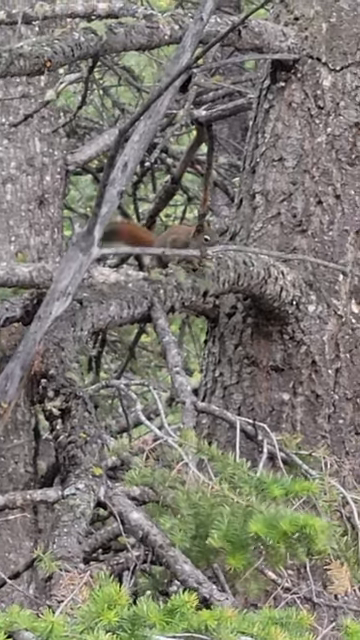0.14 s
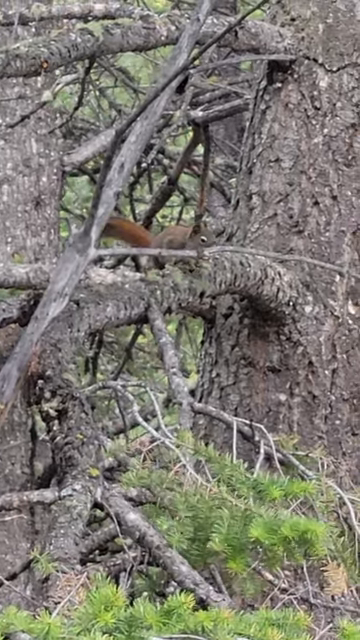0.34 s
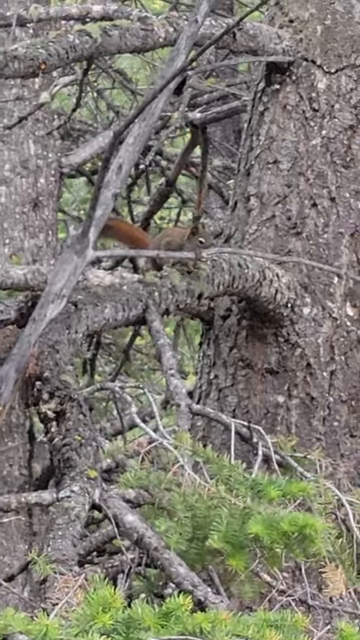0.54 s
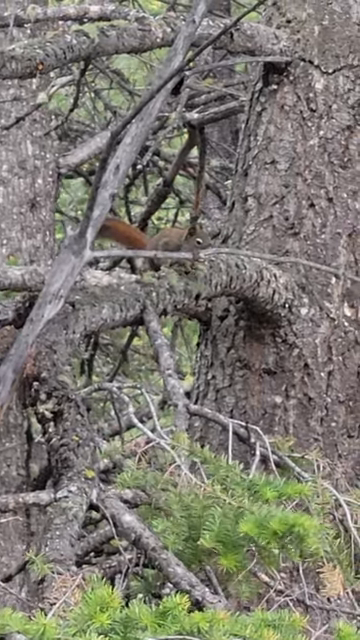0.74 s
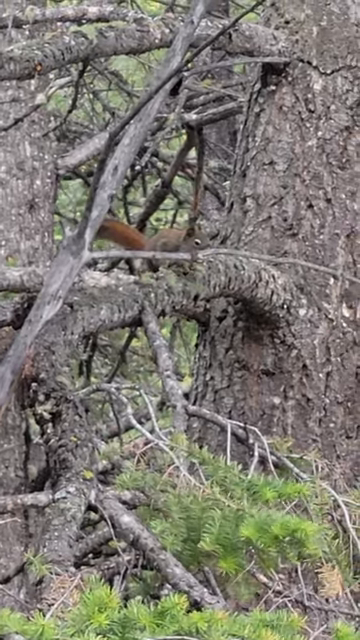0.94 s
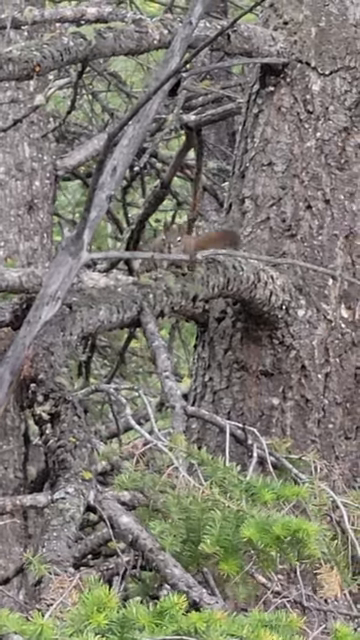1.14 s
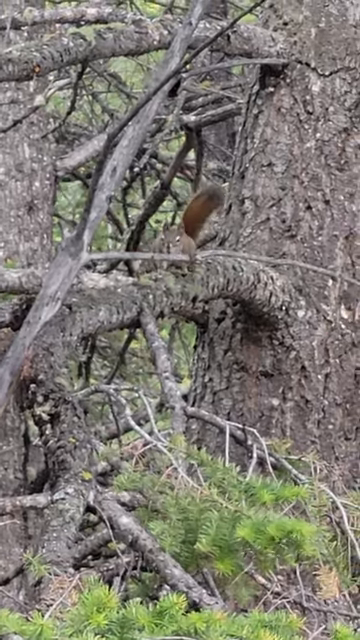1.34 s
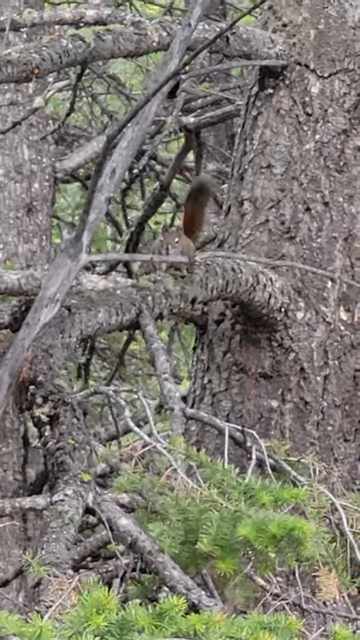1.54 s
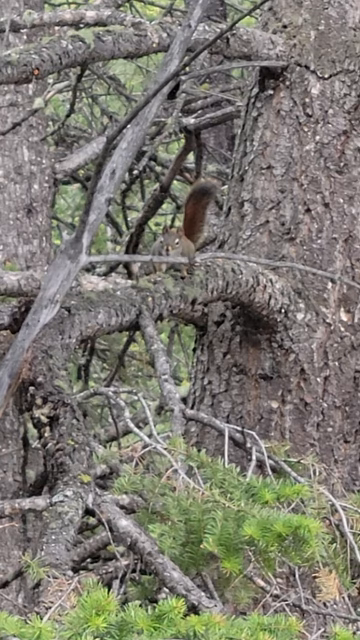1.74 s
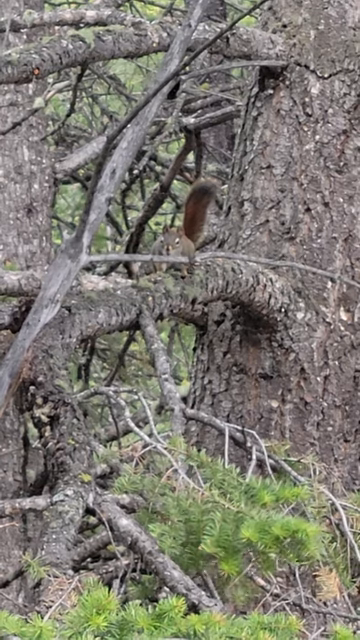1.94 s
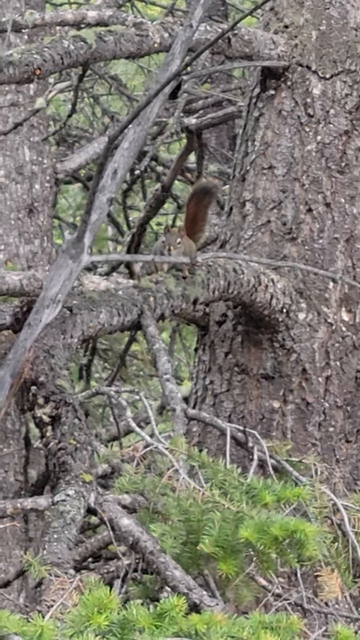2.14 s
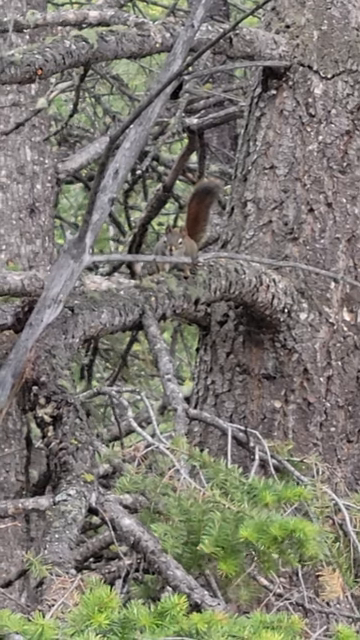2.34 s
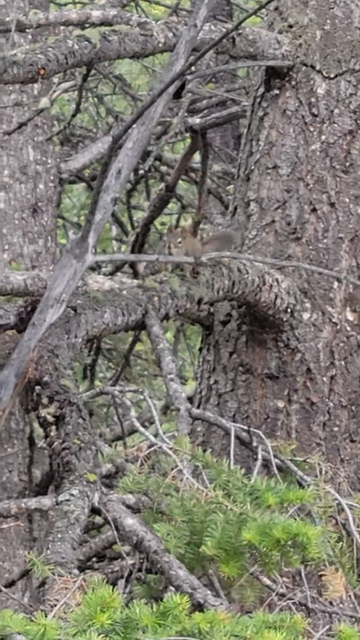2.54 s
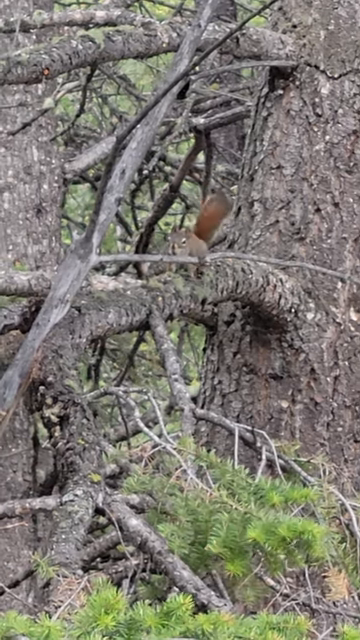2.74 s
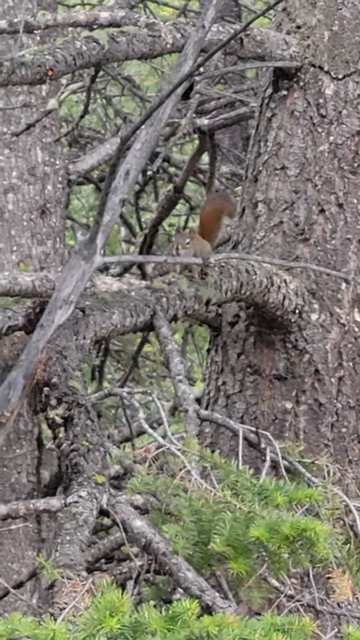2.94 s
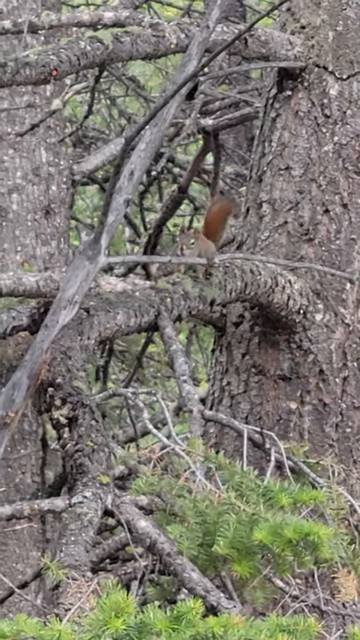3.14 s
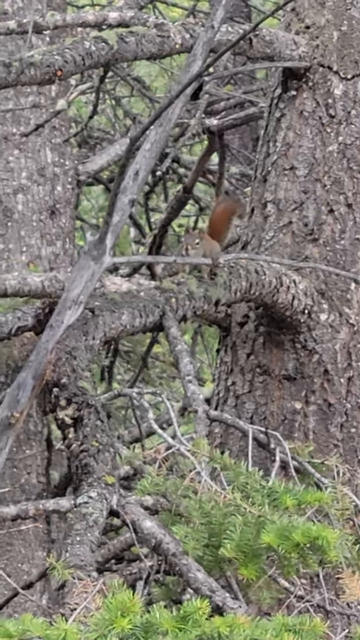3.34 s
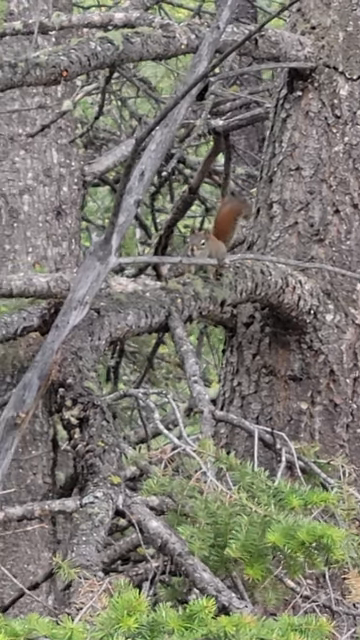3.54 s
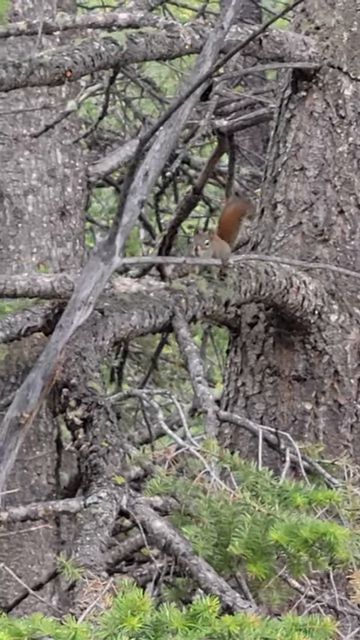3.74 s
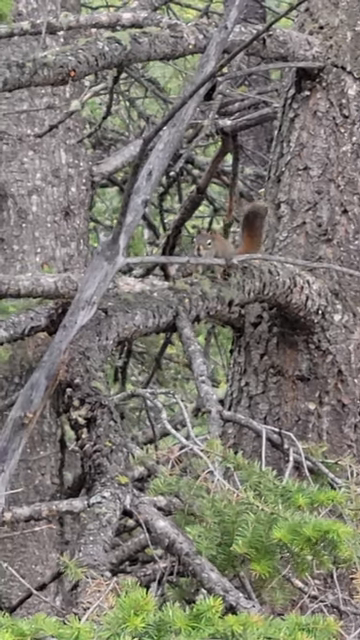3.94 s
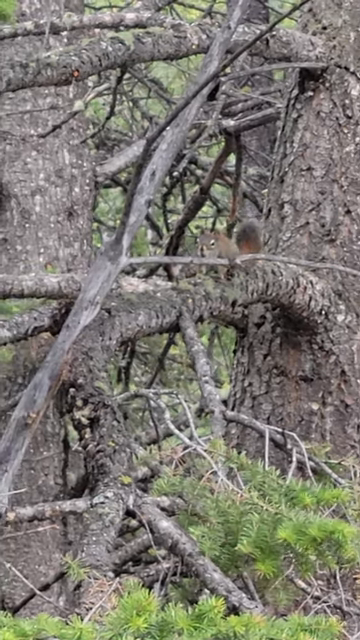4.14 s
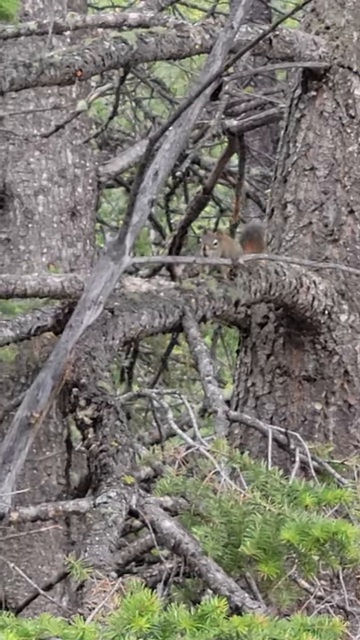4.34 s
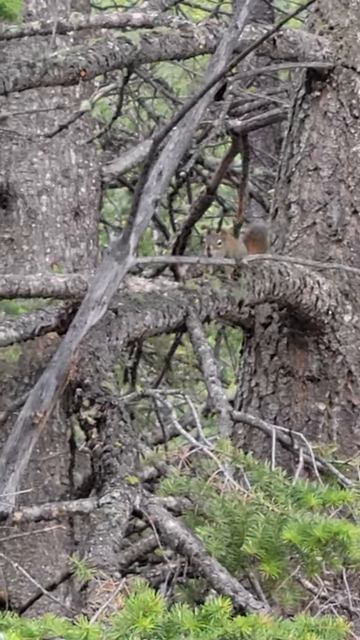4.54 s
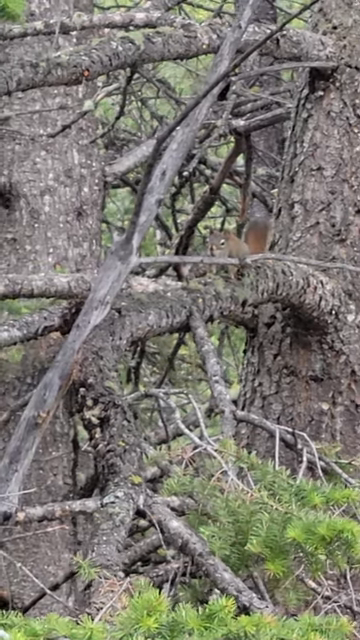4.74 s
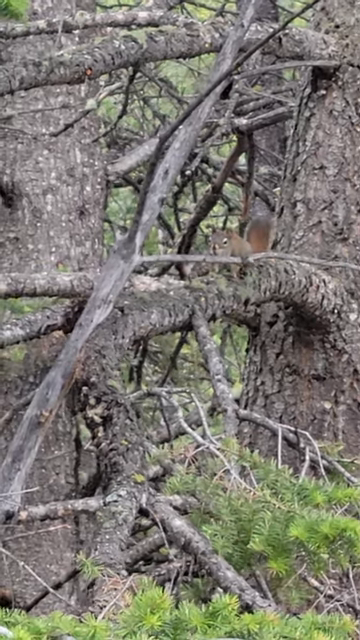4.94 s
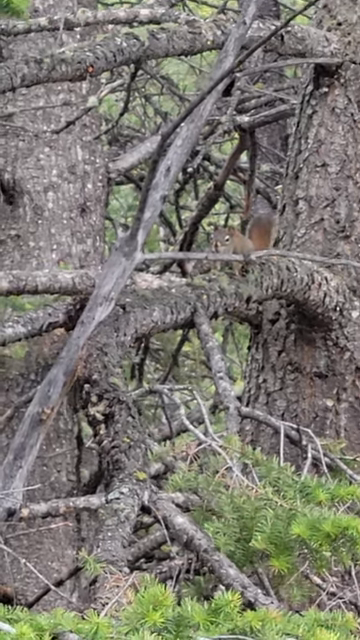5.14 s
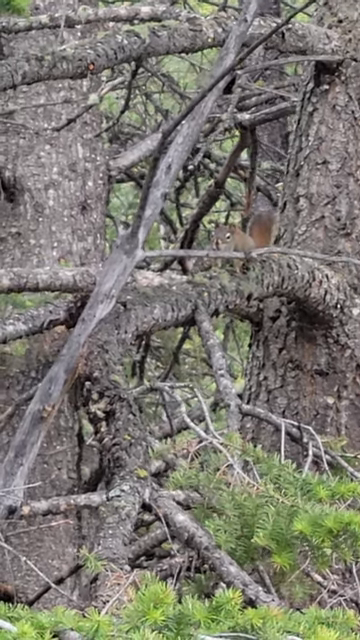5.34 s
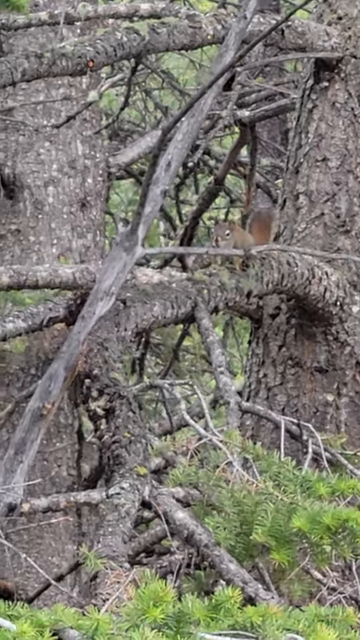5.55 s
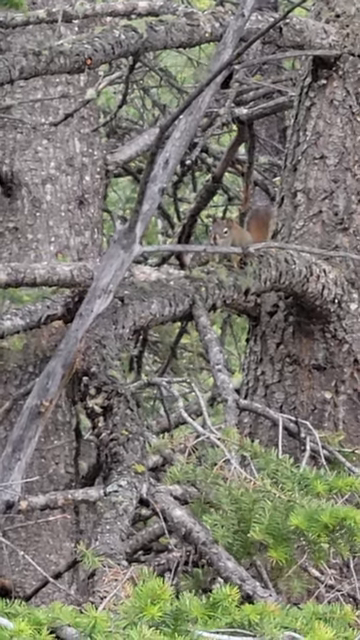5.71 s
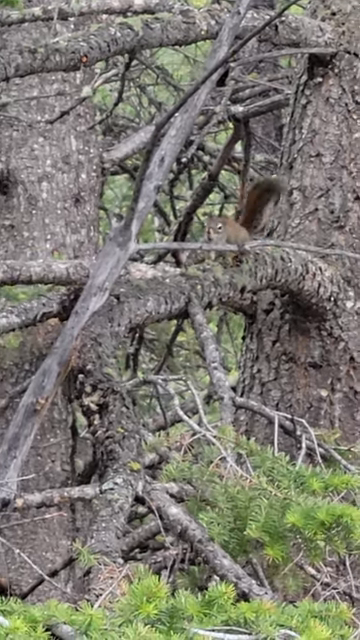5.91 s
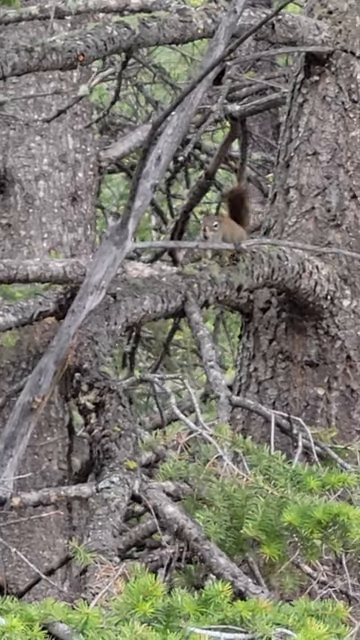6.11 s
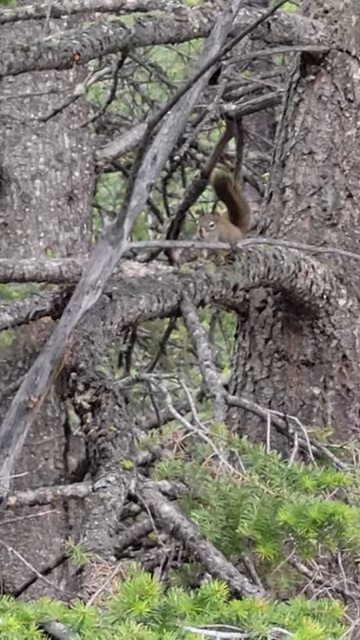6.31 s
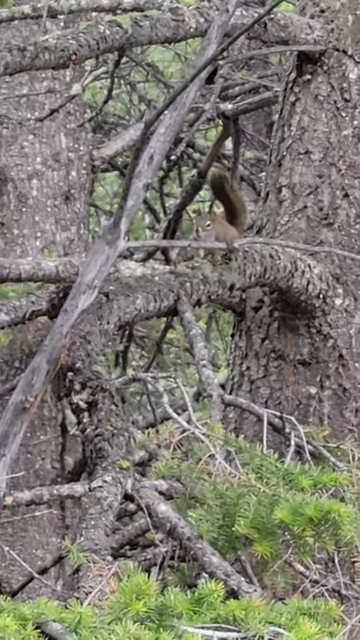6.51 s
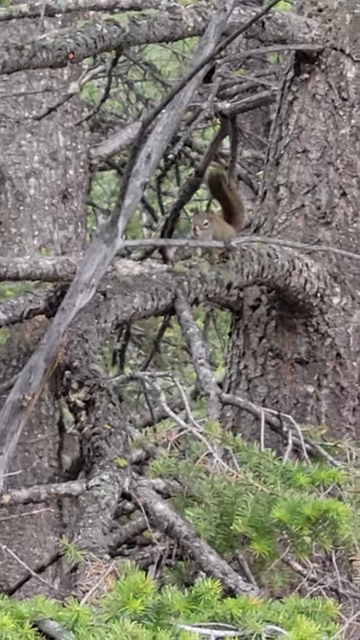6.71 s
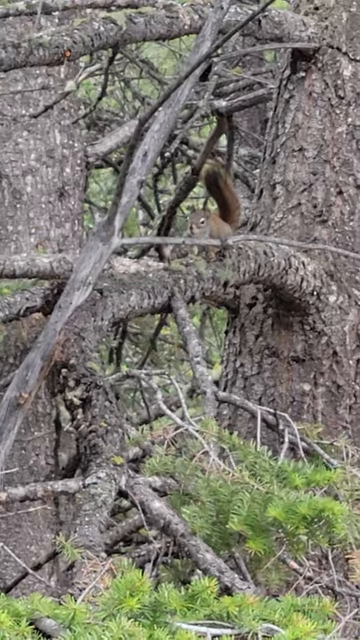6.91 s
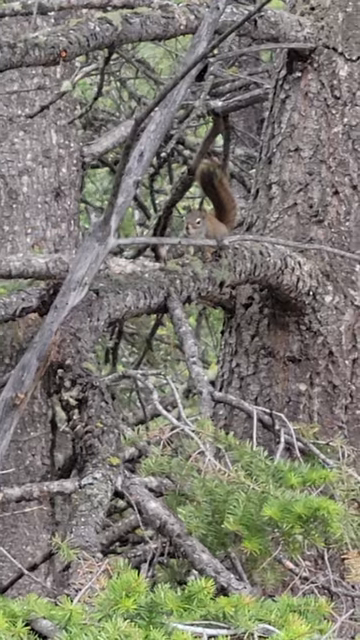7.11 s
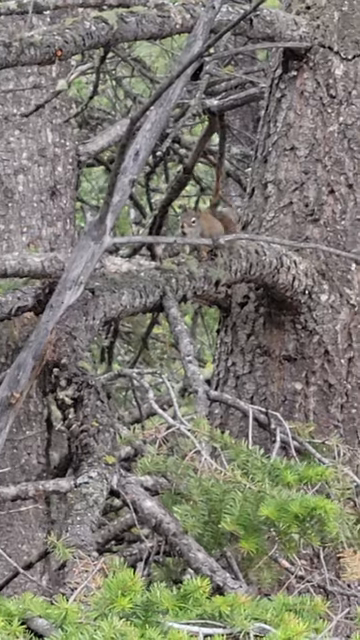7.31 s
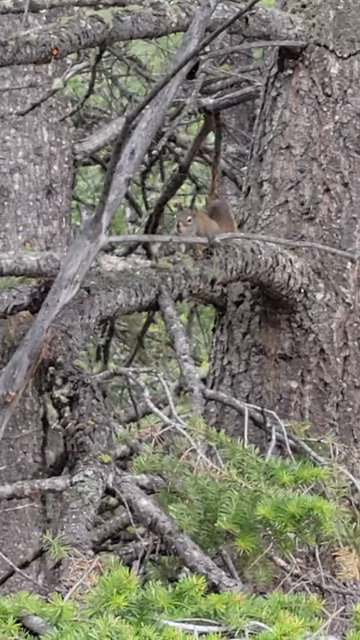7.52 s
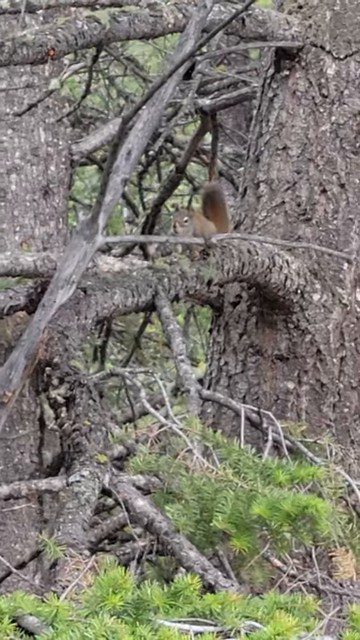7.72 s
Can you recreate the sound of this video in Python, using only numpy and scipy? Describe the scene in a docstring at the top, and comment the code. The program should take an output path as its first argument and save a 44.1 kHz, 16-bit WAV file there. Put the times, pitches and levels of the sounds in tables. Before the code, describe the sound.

Sharp, high squirrel chirps come in irregular little clusters among trees while soft gusts rumble against the microphone.

```python
"""A red squirrel scolds from a branch in a conifer forest, a few metres from a phone's stereo microphones.
Each call chains hoarse barks (vocal folds, pitch sliding up through a throat resonance), thin whistled
squeaks between them and often a quick three-note lead-in. Trunks scatter the calls into a short tail.
Wind buffets the two microphone ports; behind it lie a far treetop hush, faint twitters and one low moan."""
import sys
import numpy as np
from scipy import signal
from scipy.fft import rfft, irfft, next_fast_len
from scipy.io import wavfile
from scipy.ndimage import uniform_filter1d

SR = 44100
rng = np.random.default_rng(int(sys.argv[2]) if len(sys.argv) > 2 else 0)


def master_out(mix):
    """Clip the mix to full scale and print it as 16-bit PCM to the path in sys.argv[1]."""
    frames = np.transpose(np.atleast_2d(mix))
    ceiling = np.clip(frames, -1, 1)
    pcm = np.round(ceiling * 32767).astype(np.int16)
    wavfile.write(sys.argv[1], SR, pcm)


N = 342657
TIME = np.arange(N) / SR


def undb(db):
    """Decibels to amplitude."""
    return 10 ** (np.asarray(db) / 20)


def unit(x):
    """Scale to rms 1."""
    return x / np.sqrt(np.mean(x ** 2))


def over_hz(table, size, column=1):
    """A table column at every bin of a transform, joined by straight lines on a log frequency axis."""
    hz = np.maximum(np.arange(size // 2 + 1) * SR / size, 1)
    return np.interp(np.log(hz), np.log([row[0] for row in table]), [row[column] for row in table])


def noise(table):
    """Steady noise of the given colour, rms 1."""
    size = next_fast_len(N)
    spectrum = rfft(rng.standard_normal(size)) * undb(over_hz(table, size))
    return unit(irfft(spectrum, size)[:N])


def colour(x, table):
    """Causal filter with the table's gain, built from the cepstrum."""
    cepstrum = irfft(np.log(undb(over_hz(table, 2048))))
    cepstrum[1:1024] *= 2
    cepstrum[1025:] = 0
    impulse = irfft(np.exp(rfft(cepstrum)))[:1024]
    return signal.fftconvolve(x, impulse)[:len(x)]


def walk(rate, size=N):
    """Random levels held 1 / rate s and smoothed twice; spread near 1."""
    hold = max(int(SR / rate), 1)
    steps = np.repeat(rng.standard_normal(size // hold + 1), hold)
    return 1.67 * uniform_filter1d(uniform_filter1d(steps, hold), hold)[:size]


# The forest's noise floor at the phone. Each row: frequency in Hz, relative level in dB.
HUSH_COLOUR = [(88, -41), (150, -12.5), (182, -20.5), (315, -4.5), (406, -8.5), (589, -6.5), (637, -7),
               (730, -7), (1690, -20), (2270, -30), (3700, -31.5), (9820, -52), (14800, -40), (16000, -47)]
# How alike the hush is in the two microphones. Each row: frequency in Hz, correlation from 0 to 1.
HUSH_ALIKE = [(130, 0.3), (290, 0.9), (500, .8), (900, 0.3), (1410, .35), (2500, 0), (16000, 0)]


def hush(level_db=-60.5):
    """Far wind in the treetops and the microphones' own hiss, a little louder on the right."""
    size = next_fast_len(N)
    alike = np.clip(over_hz(HUSH_ALIKE, size), 0, 1)
    mid, side = (rfft(rng.standard_normal(size)) * undb(over_hz(HUSH_COLOUR, size)) for _ in range(2))
    mid, side = mid * np.sqrt(1 + alike), side * np.sqrt(1 - alike)
    pair = np.array([irfft(mid + side, size)[:N], irfft(mid - side, size)[:N]])
    swell_db = .5 * walk(2)
    return unit(pair) * undb(level_db + swell_db + np.array([[-1.3], [1.3]]))


# Faint twitters far off in the forest.
# Each row: start in seconds, length in seconds, centre in Hz, width in Hz, level in dB.
TWITTERS = [(2.1, .19, 4900, 1100, -74), (1.9, .5, 3250, 600, -73), (1.92, .4, 2250, 400, -75),
            (3.45, .28, 3300, 600, -76), (3.53, .08, 5500, 200, -76), (6.9, .32, 3100, 900, -77),
            (7.02, .15, 4800, 900, -80)]


def twitters():
    """Distant calls heard only as blurred bands of noise, unlike in each microphone."""
    out = np.zeros((2, N))
    for start, length, hz, width_hz, db in TWITTERS:
        a, size = int(start * SR), int(length * SR)
        sos = signal.butter(2, [hz - width_hz / 2, hz + width_hz / 2], "bandpass", fs=SR, output="sos")
        band = unit(signal.sosfilt(sos, rng.standard_normal((2, size))))
        out[:, a:a + size] += undb(db) * band * np.sqrt(np.hanning(size))
    return out


# A faint low moan in the background. Each row: time in seconds, pitch in Hz, level in dB.
MOAN = [(6.46, 490, -75), (6.48, 480, -60), (6.58, 440, -64), (6.66, 410, -60), (6.76, 410, -60),
        (6.78, 400, -80)]


def moan(waver=.07, flutter_db=3.0):
    """A soft tone that wavers and sinks, the same in both microphones."""
    times, hz, db = np.transpose(MOAN)
    pitch = np.interp(TIME, times, hz) * (1 + waver * walk(60))
    level_db = np.interp(TIME, times, db, -200, -200) + flutter_db * walk(40)
    return undb(level_db) * np.sin(2 * np.pi * np.cumsum(pitch) / SR)


# Wind right at the microphone ports. Each row: time in seconds, level in dB,
# upper rumble against that level in dB, left minus right in dB.
GUSTS = [(0.0, -18, -12, -1), (0.17, -22, -13, 0), (0.43, -41, -22, 5), (0.79, -46, -22, 5),
         (0.91, -31, -19, 1), (1.24, -30, -19, 5), (1.41, -47, -22, 7), (1.64, -38, -22, -7),
         (2.17, -54, -18, 8), (2.86, -42, -22, 2), (3.16, -46, -22, 1), (3.33, -31, -21, -7),
         (3.58, -48, -18, 3), (3.72, -30, -15, 1), (4.07, -47, -22, 3), (4.27, -38, -22, 6),
         (4.9, -48, -19, -2), (5.19, -32, -22, -4), (5.43, -45, -22, 4), (5.65, -47, -22, 9),
         (5.9, -33, -14, 7), (5.99, -22, -9, 4), (6.12, -18, -8, 1), (6.23, -29, -11, 0),
         (6.35, -19, -14, 1), (6.58, -18, -6, -5), (6.8, -26, -8, -1), (6.95, -18, -7, 0),
         (7.39, -30, -11, 2), (7.77, -28, -12, -2)]
# The wind's deep rumble in the microphones. Each row: frequency in Hz, relative level in dB.
LOW_RUMBLE = [(8.8, -43.5), (15, -12), (30, -1), (50, 4.5), (68, 7), (90, 4), (119, -14), (200, -33),
              (260, -53), (440, -120)]


def wind(gust_db=3.5, port_db=3.0, upper_flutter_db=4.0, alike=0.3, ceiling=.45):
    """Eddies press mostly on each port alone, in quick uneven gusts; the upper rumble flutters more."""
    times, low_db, upper_db, pan_db = np.transpose(GUSTS)
    shared_rumble, shared_db = noise(LOW_RUMBLE), gust_db * walk(22)
    out = []
    for side in (.5, -.5):
        quick_db = shared_db + port_db * walk(18)
        uneven = unit(undb(quick_db - uniform_filter1d(quick_db, SR // 5)))
        low = unit(np.sqrt(alike) * shared_rumble + np.sqrt(1 - alike) * noise(LOW_RUMBLE))
        upper = noise([(60, -49), (125, 5), (200, -4), (350, -29), (800, -52.5), (2000, -91.5)])
        upper = unit(upper * undb(upper_flutter_db * walk(30)))
        level = undb(np.interp(TIME, times, low_db + side * pan_db)) * uneven
        out.append(level * (low + undb(np.interp(TIME, times, upper_db)) * upper))
    return ceiling * np.tanh(np.array(out) / ceiling)  # the membranes round the hardest pushes


# Sharp knocks of wind on the phone. Each row: start in seconds, relative level in dB,
# left minus right in dB.
BUFFETS = [(0.044, -40, -13), (6.025, -49, 12.5), (6.118, -41, -22), (6.314, -51, -9.5), (6.517, -45, -6.5),
           (6.585, -39, -10), (6.839, -49, -10), (6.92, -39, -5), (6.946, -29.5, 2.0), (6.968, -38, -9)]


def buffets(push_s=.0009, boost_db=7):
    """A short swing of pressure, up and then down, strongest on the nearer port."""
    out = np.zeros((2, N))
    for start, db, pan_db in BUFFETS:
        span = slice(int(start * SR), int(start * SR) + 800)
        u = (TIME[span] - start) / push_s - 5
        push = -u * np.exp(-u ** 2 / 2)
        out[:, span] += undb(db + boost_db + np.array([[pan_db], [-pan_db]]) / 2) * push
    return out


# The echo of the trees around the branch and the phone.
# Each row: band centre in Hz, seconds for the near trunks' echo to fall 60 dB, relative level in dB.
FOREST_ECHO = [(1050, 0.12, -10.5), (2000, 0.2, -10), (3200, .33, -14.5), (4630, 0.26, -10.5),
               (7640, 0.23, -9), (11000, 0.14, -14.5), (15000, 0.14, -12)]


def forest(x, twigs_db=4, twigs_t60=.045, far_db=-17, far_stretch=3.22, air_db_per_hz_s=.004):
    """Scatter unlike in each port: twigs by the animal at once, near trunks, a faint tail from far ones."""
    t, hz = np.arange(SR) / SR, np.maximum(np.arange(SR // 2 + 1), 1)
    out = []
    for _ in range(2):
        tail = 0
        for centre, t60, db in FOREST_ECHO:
            band = irfft(rfft(rng.standard_normal(SR)) * np.exp(-(np.log2(hz / centre) / 0.57) ** 2))
            twigs = undb(twigs_db - 60 * t / twigs_t60)
            near = undb(-60 * t / t60)
            air_loss_db = air_db_per_hz_s * centre * t  # long paths lose treble to the air
            far = undb(far_db - 60 * t / (t60 * far_stretch) - air_loss_db)
            tail = tail + undb(db) * band * (twigs + near + far) / np.sqrt(t60 * SR / 14)
        onset = np.clip(t / .0005 - 1, 0, 1)  # half a millisecond behind the direct sound
        patchy = undb(walk(120, size=SR))
        sway = 1 + .2 * walk(400)  # swaying boughs keep the echoes from holding one pitch
        out.append(signal.fftconvolve(x, tail * onset * patchy)[:N] * sway)
    return np.array(out)


# Left microphone against right, for sound coming from the branch.
# Each row: frequency in Hz, phase lead of the left in radians, left minus right in dB.
PORT_CONTRAST = [(500, 0, -2), (1200, .5, -2.8), (1600, 0, -1), (2800, 0, -1.8), (3300, 1, 0),
                 (4300, .3, 1), (5600, 1.7, -2.4), (6200, 2.2, -1), (6800, 2.4, 1), (8000, 5.6, 3.5),
                 (9200, 7.3, 6), (10400, 7.4, 2.7), (12200, 8.5, 0), (12800, 8.6, -1), (14000, 13, 2.3),
                 (15200, 14.1, 3.7)]


def ports(x):
    """The phone's body delays and shades one port against the other."""
    size = next_fast_len(N + 4096)
    lead, pan_db = over_hz(PORT_CONTRAST, size), over_hz(PORT_CONTRAST, size, column=2)
    half = undb(pan_db / 2) * np.exp(.5j * lead)
    spectrum = rfft(x, size)
    return np.array([irfft(spectrum * half, size)[:N], irfft(spectrum / half, size)[:N]])


# The squirrel's squeaks after a bark.
# Each row: start in seconds, length in seconds, middle pitch in Hz, level in dB.
SQUEAKS = [(0.159, 0.016, 6340, -19.5), (1.132, 0.015, 6360, -20.5), (1.578, 0.017, 6260, -19.5),
           (2.572, 0.014, 6220, -22), (2.823, 0.014, 5760, -24.5), (3.05, 0.01, 5300, -30),
           (3.923, 0.013, 6190, -19), (4.694, 0.014, 6150, -21.5), (5.924, 0.0092, 6020, -22.5),
           (6.215, 0.018, 6190, -19.5), (7.427, 0.015, 6230, -19.5), (7.712, 0.015, 6220, -23)]
# Its lead-ins: a rising note, a high note, then a falling chip.
# Each row: start of the chip in seconds, then the levels of the three notes in dB.
LEAD_INS = [(0.119, -49.5, -46.5, -21.5), (1.09, -44, -34, -25), (1.358, -39, -44, -24),
            (2.53, -52, -41.5, -27.5), (2.78, -33, -39, -23), (3.046, -20.5, -38, -60),
            (3.878, -41.5, -43, -26.5), (4.133, -55, -41, -23), (4.388, -23.5, -38.5, -23.5),
            (5.876, -55, -45.5, -27), (7.385, -45, -35.5, -25.5)]
# The three notes of a lead-in. Each row: seconds ahead of the chip, length in seconds,
# first, middle and last pitch in Hz, swell from middle to end in dB.
LEAD_NOTES = [(.0195, .007, 5200, 6000, 6500, -2.5), (.013, .014, 7800, 8500, 7700, 2.5),
              (0, .004, 6450, 5750, 5300, -1.5)]


def whistled_notes():
    """All squeaks and lead-in notes as (start s, length s, first, middle, last Hz, level dB, swell dB)."""
    notes = [(start, length, .945 * hz, hz, .965 * hz, db, 1.5) for start, length, hz, db in SQUEAKS]
    for chip, *levels in LEAD_INS:
        for (ahead, length, first, middle, last, swell_db), db in zip(LEAD_NOTES, levels):
            notes.append((chip - ahead, length, first, middle, last, db, swell_db))
    return notes


def whistles(octave_db=-18, jitter=0.011, shake_db=3.0, air_db=-22):
    """Near-pure whistles from the branch: bent ends, a flat middle, a weak octave, a little air."""
    out = np.zeros(N)
    wobble, shake = walk(600), walk(300)
    for start, length, first_hz, mid_hz, last_hz, db, swell_db in whistled_notes():
        a = int(start * SR)
        b = a + int(length * SR)
        u = np.linspace(-1, 1, b - a)
        # first and last pitch are passed shortly inside the ends, where the whistle is fading
        hz = mid_hz + (np.where(u < 0, first_hz, last_hz) - mid_hz) * (np.abs(u) / .85) ** 3
        phase = 2 * np.pi * np.cumsum(hz * (1 + jitter * wobble[a:b])) / SR
        level_db = db + swell_db * u - abs(swell_db) * .5 + shake_db * shake[a:b]
        octave = undb(octave_db) * (mid_hz < 7500) * np.sin(2 * phase)
        air = undb(air_db) * np.diff(rng.standard_normal(b - a + 1))
        out[a:b] += undb(level_db) * (1 - u ** 2) ** .6 * (np.sin(phase) + octave + air)
    return out


# The squirrel's barks, a few metres from the phone. Each row: start in seconds, length in seconds,
# top pitch in Hz, then voice and rasp levels in dB before their colouring.
BARKS = [(0.128, 0.024, 1715, -14.5, -21), (0.177, 0.024, 1430, -22, -25.5), (1.097, 0.027, 1750, -15, -22),
         (1.155, 0.015, 1437, -16.5, -22.5), (1.364, 0.028, 1725, -15, -22.5),
         (1.549, 0.025, 1410, -17, -27), (1.61, 0.018, 1410, -19.5, -25), (2.539, 0.025, 1703, -13.5, -22),
         (2.592, 0.02, 1465, -18.5, -28), (2.788, 0.026, 1632, -15, -20.5),
         (2.999, 0.029, 1460, -27.5, -29.5), (3.888, 0.024, 1701, -12, -20.5),
         (3.94, 0.021, 1487, -16.5, -24), (4.141, 0.025, 1590, -15.5, -21.5),
         (4.338, 0.027, 1450, -28.5, -27.5), (4.398, 0.018, 1418, -16.5, -25),
         (4.661, 0.027, 1620, -16, -24.5), (4.714, 0.0214, 1462, -16.5, -24.5),
         (5.885, 0.028, 1790, -12, -22), (5.935, 0.023, 1528, -16.5, -26),
         (6.181, 0.027, 1591, -17.5, -25.5), (6.237, 0.021, 1504, -15.5, -25.5),
         (7.395, 0.024, 1640, -12.5, -22), (7.447, 0.022, 1450, -17, -26.5),
         (7.679, 0.028, 1506, -19.5, -27), (7.731, 0.026, 1478, -16.5, -27)]
# Throat and mouth resonances on the overtones. Each row: frequency in Hz, gain in dB.
THROAT = [(600, -50), (950, -30), (1230, -14), (1420, -24), (1680, -21), (2050, -36), (2600, -8.5),
          (3100, 2.5), (3450, -2.5), (3800, -28), (4500, -35.5), (6200, -11), (8000, -14), (9500, -26),
          (11500, -16.5), (16000, -33.5)]
# Colour of the turbulent air in a bark. Each row: frequency in Hz, gain in dB.
RASP = [(600, -28), (1300, -11.5), (2050, -29), (2900, 2), (3800, -16), (5000, -2.5), (6500, -2),
        (8000, -4.5), (9300, -6), (11000, 2), (12800, -5), (15000, -11)]


def barks(slack_hz=1190, rise=.84, sag=.04, jitter=.038, hoarse=.006, shake_db=2.0, leak_s=.012):
    """Vocal folds slide up from their slack pitch; turbulent air leaks ahead, then puffs once a cycle."""
    voice, air = np.zeros(N), np.zeros(N)
    wobble, shake = walk(700), walk(350)
    breath = rng.standard_normal(N)
    leak = int(leak_s * SR)
    for start, length, top_hz, voice_db, rasp_db in BARKS:
        a = int(start * SR)
        b = min(a + int(length * SR), N)
        u = np.linspace(0, 1, b - a)
        climb = np.sin(np.pi / 2 * np.minimum(u / rise, 1)) ** 2
        droop = 1 - sag * np.maximum(u - rise, 0) / (1 - rise)
        hz = (slack_hz + (top_hz - slack_hz) * climb) * droop
        # the folds start unsteady and settle as the pitch tops out; airy barks stay unsteady
        unsteady = jitter * (1.15 - climb) + hoarse * max(rasp_db - voice_db + 10, 0)
        phase = 2 * np.pi * np.cumsum(hz * (1 + unsteady * wobble[a:b])) / SR
        overtones = sum(np.cos(k * phase) * (k * hz < 17000) for k in range(1, 15))
        loudest_at = np.clip(.65 + .9 * (top_hz - 1450) / 1000, .1, .9)  # higher barks peak later
        effort_db = np.interp(u, [0, loudest_at, 1], [-19, 0, -6]) + shake_db * shake[a:b]
        edges = np.clip(u / .2, 0, 1) * np.clip((1 - u) / .1, 0, 1)
        voice[a:b] = undb(voice_db + effort_db) * edges * overtones
        exhale = np.clip(u / 0.19, 0, 1) ** 1.5 * np.clip((1 - u) / .3, 0, 1)
        air[a:b] += undb(rasp_db) * exhale * (1 + .5 * np.cos(phase))
        air[a - leak:a + leak] += undb(rasp_db - 22) * np.hanning(2 * leak)
    return colour(voice, THROAT) + colour(air * breath, RASP)


def scene():
    """At the phone: the squirrel direct and off the trees, wind on the ports, the forest behind."""
    squirrel = barks() + whistles()
    return ports(squirrel) + forest(squirrel) + wind() + buffets() + hush() + twitters() + moan()


def record(dry, top_hz=15950):
    """The phone cuts the highest treble off steeply."""
    return signal.sosfilt(signal.ellip(14, .2, 95, top_hz, fs=SR, output="sos"), dry)


dry = scene()
out = record(dry)
master_out(out)
```